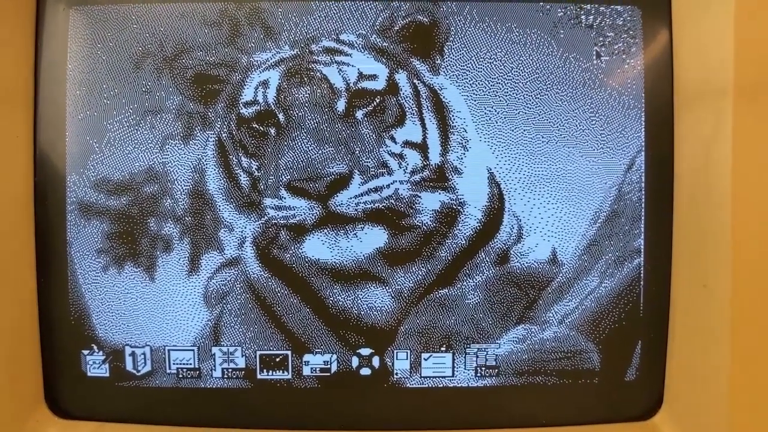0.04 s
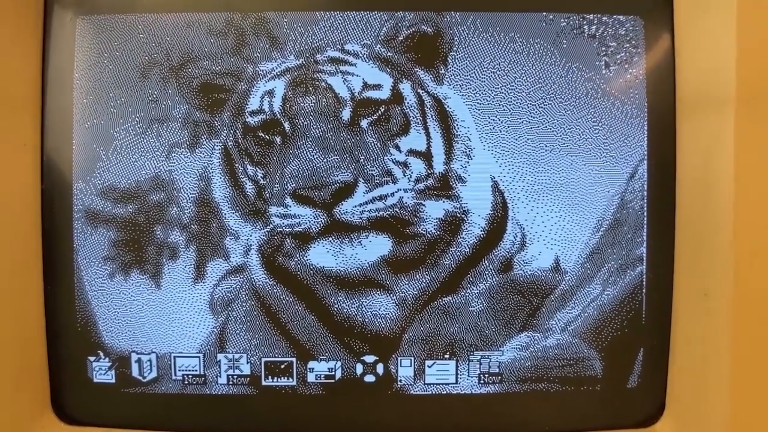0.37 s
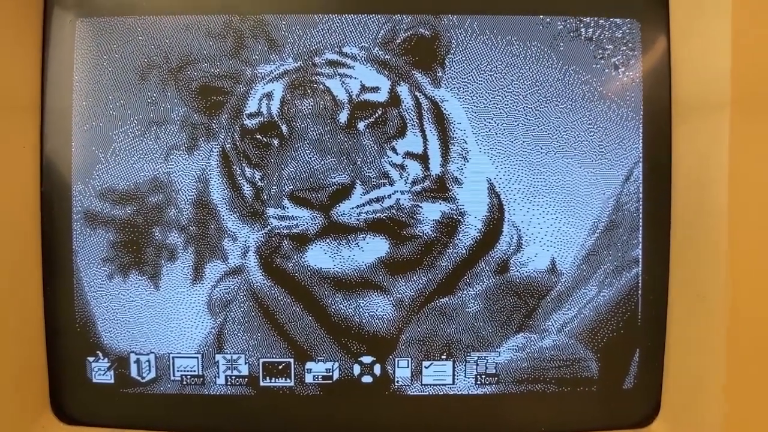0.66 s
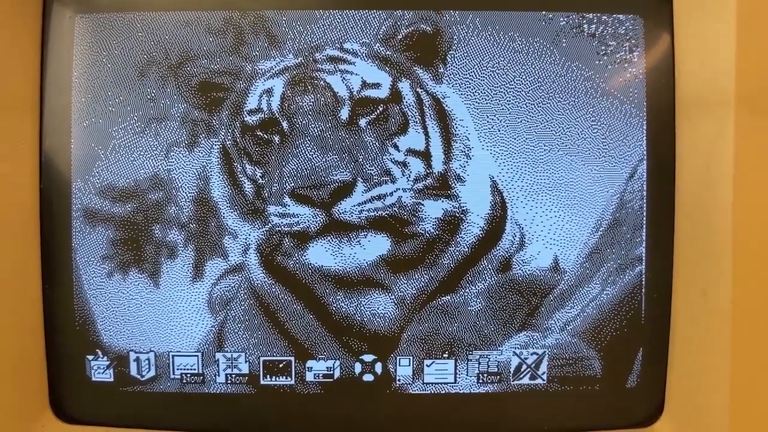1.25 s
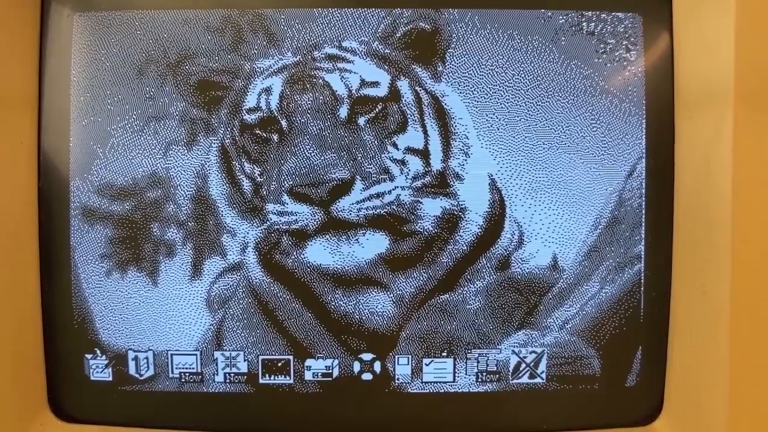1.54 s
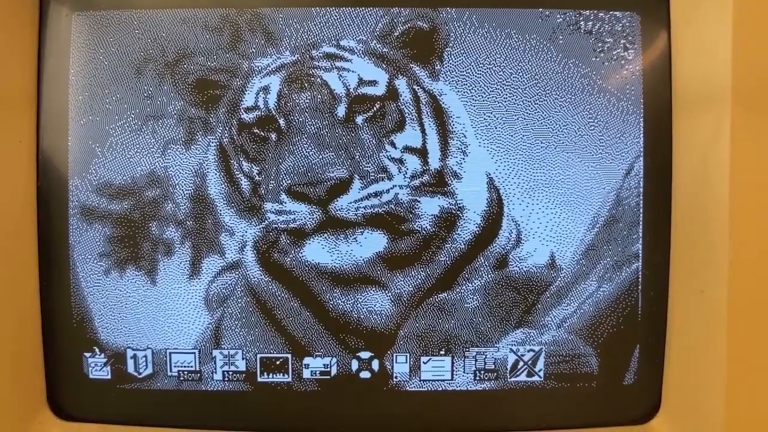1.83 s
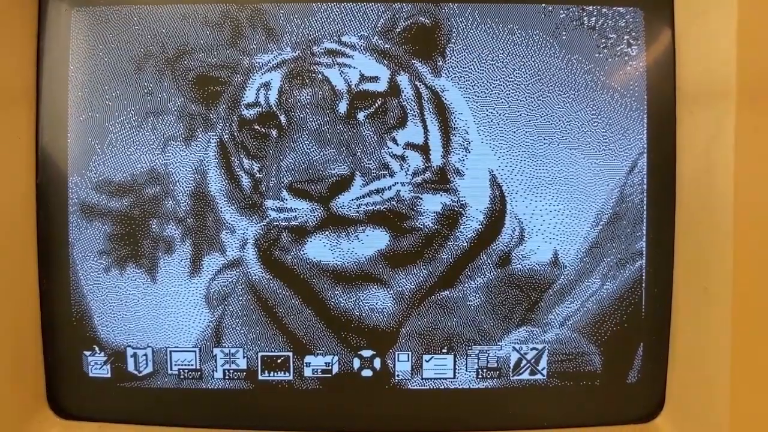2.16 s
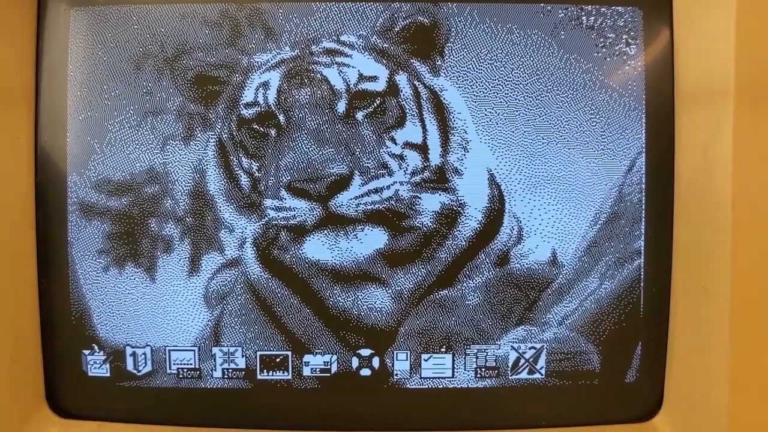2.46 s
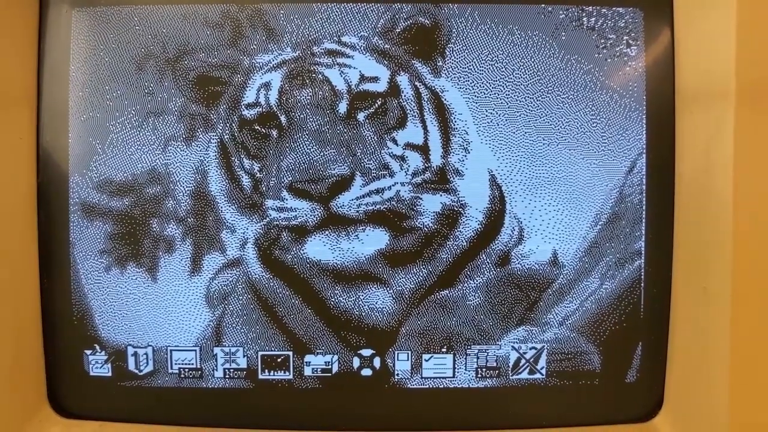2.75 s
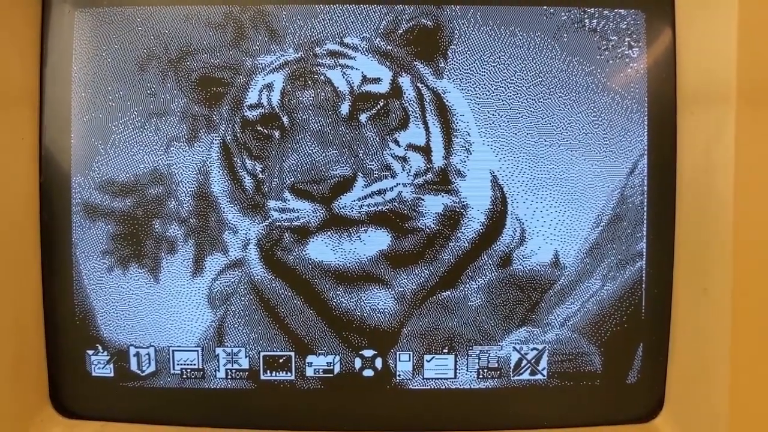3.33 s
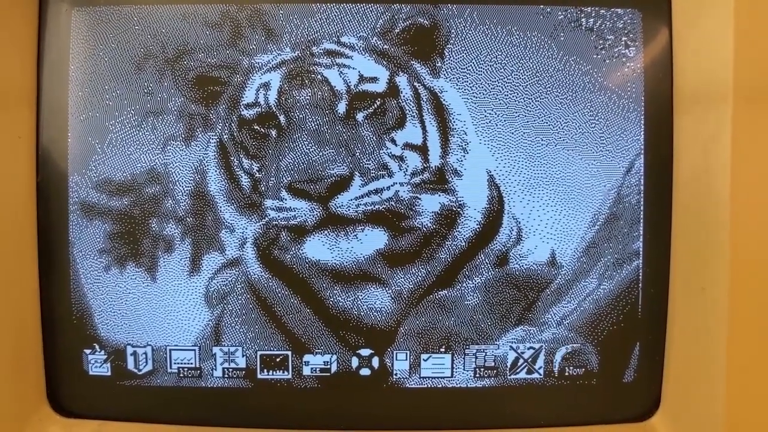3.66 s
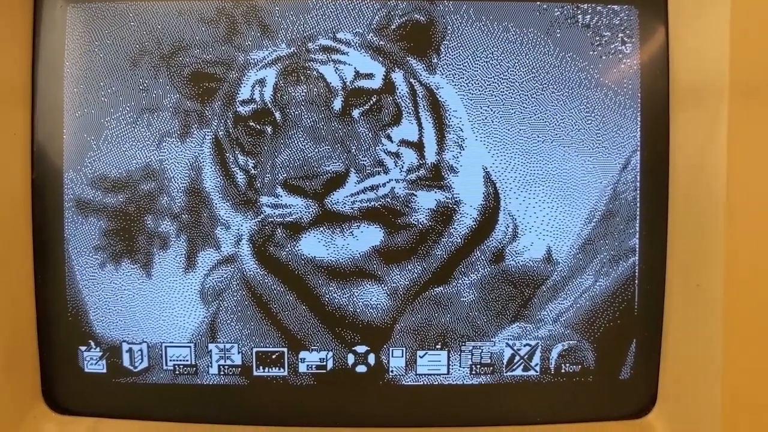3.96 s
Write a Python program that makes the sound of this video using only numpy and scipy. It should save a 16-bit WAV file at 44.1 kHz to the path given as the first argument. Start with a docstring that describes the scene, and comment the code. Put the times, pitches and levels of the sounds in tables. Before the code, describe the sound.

Disk drive chatter from an old computer runs throughout: short chirping rattles, soft knocks from the case and occasional sharp ticks, echoing briefly in a room. A steady whine, electrical hum and rumble of moving air lie underneath.

```python
"""Quick bursts of chirping, rattling and thumping come from the disk drive of an old desktop computer.
Each burst is a seek: the drive's head arm speeds up, brakes, and thumps the chassis as it stops.
A few sharp ticks fall among the seeks, and ticks and arm echo briefly in the room.
Behind them the spinning disk whines steadily over mains hum and a rumble of moving air."""
import sys
import numpy as np
from scipy import signal
from scipy.fft import rfft, irfft
from scipy.io import wavfile

SR = 44100
rng = np.random.default_rng(int(sys.argv[2]) if len(sys.argv) > 2 else 0)


def to_wav(s):
    """Save 16-bit WAV."""
    ch = np.atleast_2d(s).T  # columns
    pcm = np.round(np.clip(ch, -1, 1) * 32767)  # PCM
    wavfile.write(sys.argv[1], SR, pcm.astype(np.int16))


N = 176400  # 4 seconds

# Moves of the arm: (start [s], length [s], chirp pitch limit [Hz], arm level [dB], thump level [dB])
SEEK_MOVES = [(0.021, .014, 1900, -5.5, 2.5), (0.112, 0.028, 2800, -4.5, -0.5),
              (0.176, 0.029, 2600, -2.5, -0.5), (0.28, 0.028, 2600, -2, 0), (0.381, 0.028, 2600, -1.5, -1),
              (0.443, .015, 1970, -12, -1), (0.625, .011, 2020, -6, -4), (0.663, .012, 2030, -5, -6),
              (0.721, .012, 2050, -3.5, -4), (0.806, 0.0097, 1920, -5, -6), (0.941, 0.032, 2650, -3, -2),
              (1.009, 0.011, 1980, -2.5, -5), (1.057, 0.03, 2650, -3, -0.5), (1.18, 0.029, 2720, -2.5, 2.5),
              (1.279, 0.025, 2600, -2.5, -4), (1.348, .012, 1950, -4.5, -1.5), (1.439, .014, 2200, -5, 2),
              (1.491, .011, 2040, -3.5, -1), (1.733, 0.011, 2040, -5.5, -20), (1.778, .012, 2000, -6, -3.5),
              (1.821, .014, 2020, -3.5, -19), (1.872, 0.023, 2600, -3, 1), (1.948, .012, 1980, -5, -13),
              (1.994, .014, 1980, -5.5, -15), (2.109, 0.058, 2820, -3, -5), (2.207, .011, 2000, -7, -18),
              (2.242, .019, 1860, -2.5, -2), (2.399, 0.017, 1925, -3.5, 2.5),
              (2.463, .012, 1950, -5.5, -4.5), (2.513, .019, 2010, -2.5, -1.5),
              (2.591, .072, 2510, -4, -12), (2.729, 0.025, 2050, -2.5, 1), (2.818, .012, 2000, -4, 0),
              (2.869, .012, 2030, -5.5, -20), (3.01, 0.045, 2870, -2.5, 0),
              (3.093, 0.0065, 2000, -3.5, -20), (3.127, 0.018, 1940, -2.5, 2),
              (3.206, 0.023, 2040, -0.5, -1), (3.292, 0.052, 2513, -3, -7), (3.401, .013, 2020, -5.5, 0),
              (3.436, 0.012, 2000, -8, 0), (3.677, .014, 2050, -3.5, -8.5), (3.718, 0.049, 2480, -4, 0),
              (3.828, 0.053, 2520, -3, -0.5), (3.929, 0.049, 2520, -2, -1.5)]
# Notes at which the arm rings: (pitch [Hz], width [Hz], level [dB])
ARM_NOTES = [(954.6, 10.2, -6.5), (1165, 18, -11.5), (1599, 18, -14), (1937, 30, -0.5), (2133, 33, -10.5),
             (2470, 34, -12), (2790, 47, -7.5)]
def head_arm():
    """The moving arm chirps and rattles; the chirps and the jolts of its coil make it ring."""
    chirp, jolts = seek_chirps(), coil_jolts()
    ringing = np.zeros(N)
    for hz, width, db in ARM_NOTES:
        strikes = jolts * SR / (2 * np.pi * width)  # a jolt starts narrow and wide notes equally loud
        ringing += amp(db) * ring(chirp + strikes, hz, width)
    return (chirp + ringing) * amp([[-1.5], [1.5]]) + arm_rattle()  # a little to the right


def seek_chirps():
    """The arm crosses the disk's tracks: the faster it crosses them, the higher the chirp."""
    floor_hz, coast_hz, settle_s = 2080, 2543, .032
    chirps, shake = np.zeros(N), wander(600)
    for start, length, top_hz, db, _ in SEEK_MOVES:
        t, from_end, coast = seek_motion(length)
        limit_hz = np.where(t < settle_s, top_hz, coast_hz)  # long seeks settle on a steady zing
        track_hz = np.clip(2200 * (from_end / .0078) ** .264, floor_hz, limit_hz)
        jitter = (.052 - .04 * coast) * np.roll(shake, -round(start * SR))[:len(t)]
        phase = 2 * np.pi * np.cumsum(track_hz * (1 + jitter)) / SR
        squeak = np.sin(phase) + amp(-18.5) * np.sin(2 * phase)
        level = min(length / .032, 1) * amp(db - 6 * t / length)  # short seeks chirp less
        fade = np.minimum(from_end / .0022, 1)
        add(chirps, start, level * fade * squeak)
    return amp(-55.5) * chirps


def seek_motion(length):
    """One seek: time [s], time to its nearer end [s], and coasting (0 = pushed or braked, 1 = gliding)."""
    push_s = .0134
    t = np.arange(0, length + .065, 1 / SR)  # extra time lets the rattle die away
    from_end = np.maximum(np.minimum(t, length - t), 0)
    return t, from_end, np.clip(2 * (from_end / push_s - 1), 0, 1)


JOLT_INSET_S = .004  # jolts come about this long after a seek starts and before it ends
def coil_jolts():
    """The coil jolts the arm once to start it and once, harder, to brake it."""
    jolts = np.zeros(N)
    for start, length, _, db, _ in SEEK_MOVES:
        swing = min(length / .019, 1) ** 1.1  # short seeks swing little
        push_delay, brake_delay = .001485 * rng.random(2)
        add(jolts, start + JOLT_INSET_S + push_delay, swing * amp([db - 51]))
        add(jolts, start + length - JOLT_INSET_S + brake_delay, swing * amp([db - 49.5]))
    return signal.sosfilt(signal.butter(4, 2420, "lowpass", fs=SR, output="sos"), jolts)


# Tone colour of the arm's rattle: (frequency [Hz], level [dB])
RATTLE_COLOUR = [(100, -27), (230, 5), (330, 14), (440, -3), (560, 6), (680, 0.5), (820, 7), (950, -1.5),
                 (1040, 5.5), (1170, 4.5), (1480, -7), (1650, -18), (1920, -6.5), (2280, -11.5),
                 (2500, -9.5), (3100, -15.5), (3900, -13.5), (4800, -30.5), (5800, -23), (6800, -22.5),
                 (8200, -26), (9200, -31.5), (10400, -25.5), (13000, -52), (16000, -72)]
def arm_rattle():
    """The arm rattles as it is pushed, eases while it coasts and surges just before the braking jolt."""
    rise_s, release_s, surge_s = .0026, .013, .0054
    effort = np.zeros(N)
    for start, length, _, db, _ in SEEK_MOVES:
        t, _, coast = seek_motion(length)
        surge_at = length - JOLT_INSET_S - surge_s
        surge = 1 + amp(db - 1.5) * np.exp(-((t - surge_at) / surge_s) ** 2)
        fade = np.minimum(t / rise_s, 1) * np.exp(-np.maximum(t - length, 0) / release_s)
        add(effort, start, amp(db - 4 * coast) * surge * fade)
    grain = unit(amp(3 * wander(347)))  # makes the rattle uneven
    return amp(-53) * noise(RATTLE_COLOUR, effort * grain)


# Notes at which the chassis (the metal frame) rings: (pitch [Hz], width [Hz], level [dB])
CHASSIS_NOTES = [(228, 9.5, -17), (234, 10, -7), (297.4, 27.5, 6.5), (330.4, 55, 7)]
def chassis_thumps():
    """The chassis recoils lightly as the arm starts, and hard the other way as it stops."""
    blow_hz, blow_s = 273.3, .011
    push, t = np.zeros(N), np.arange(0, blow_s, 1 / SR)
    swell = np.sin(np.pi * (t / blow_s) ** .87)
    for start, length, _, _, db in SEEK_MOVES:
        hz = blow_hz * (1 + .086 * rng.standard_normal())
        blow = amp(db) * swell * np.sin(2 * np.pi * hz * t)
        add(push, start, amp(-12.5) * blow)
        add(push, start + length - .0025, -blow)
    ringing = sum(amp(db) * ring(push, hz, width) for hz, width, db in CHASSIS_NOTES)
    return amp(-44.5) * (push + ringing) * amp([[1], [-1]])  # a little to the left


# Sharp ticks: (time [s], snap level [dB], clack level [dB])
TICK_HITS = [(0.1316, 1.5, -4), (0.299, -17, -15), (0.963, -4.5, -11), (1.201, -2, -11),
             (1.446, -20, -10.5), (1.884, -17, -10), (2.6555, -6, -2), (3.338, -15, -6.5)]
# Tone colours of a tick's snap, high hiss and clack: (frequency [Hz], level [dB])
SNAP_COLOUR = [(300, 15), (2500, -7), (4000, 3.5), (5500, -9), (7000, -1.5), (8300, 3.5), (9500, -11),
               (12000, -21), (16000, -50)]
HISS_COLOUR = [(6000, -32), (10000, -3), (15500, -3)]
CLACK_COLOUR = [(200, -5), (700, 14), (1150, 15), (1500, 1), (2400, 3), (4200, -4.5), (5500, -10.5),
                (8500, -12), (13000, -44)]
def ticks():
    """Hard little contacts: a snap, brighter the harder it is, then a duller clack that swells and dies."""
    snap_s, tail_s, hiss_s, clack_s = .0014, .0027, .0044, .0046
    snap, hiss, clack = np.zeros((3, N))
    t = np.arange(0, .06, 1 / SR)
    for start, snap_db, clack_db in TICK_HITS:
        add(snap, start, amp(snap_db) * (np.exp(-t / snap_s) + amp(-19) * np.exp(-t / tail_s)))
        add(hiss, start, amp(4.5 * snap_db) * np.exp(-t / hiss_s))  # heard on the hardest snaps only
        add(clack, start, amp(clack_db) * np.sqrt(2 * np.e * t / clack_s) * np.exp(-t / clack_s))
    return (amp(-46.5) * noise(SNAP_COLOUR, snap)
            + amp(-75) * noise(HISS_COLOUR, hiss)
            + amp(-46) * noise(CLACK_COLOUR, clack))


# Tones of the whine: (multiple of the spin rate, left level [dB], right level [dB])
WHINE_TONES = [(1, -60.5, -60), (6, -72.5, -96), (12, -56, -61), (13, -75, -63), (17, -67, -80),
               (18, -67.5, -76), (19, -72.5, -59), (24, -85.5, -70), (25, -87, -79), (29, -85, -74),
               (31, -71, -83), (37, -78.5, -77), (44, -94, -83), (49, -86, -94), (64, -89, -86)]
def spindle_whine():
    """The disk whines at multiples of its barely wavering spin rate, left and right a bit out of step."""
    spin_hz = 69.75 * (1 + .0004 * wander(1.2))
    turns = np.cumsum(spin_hz) / SR
    whine = np.zeros((2, N))
    for multiple, left_db, right_db in WHINE_TONES:
        side_shift = rng.choice([-1, 1]) * np.array([[.05], [-.05]])
        cycles = multiple * turns + rng.random() + side_shift
        whine += amp([[left_db], [right_db]]) * np.sin(2 * np.pi * cycles)
    return np.sqrt(2) * whine


def mains_hum(hz=60):
    """The alternating current of the power line makes one low, steady tone."""
    return amp(-56.5) * np.sqrt(2) * np.sin(2 * np.pi * hz * np.arange(N) / SR)


# Tone colour of the moving air: (frequency [Hz], level [dB])
AIR_COLOUR = [(20, -33), (35, -22.5), (50, -15), (65, -1), (100, -3.5), (160, -1), (188, -4), (225, -4),
              (310, -5), (380, -13), (460, -20), (560, -20), (660, -18.5), (850, -24), (1050, -24),
              (1250, -26), (1480, -29.5), (1750, -25.5), (2100, -33), (2350, -35), (2800, -35.5),
              (3600, -36.5), (4500, -41.5), (5500, -46), (7500, -46), (8800, -51.5), (10600, -50.5),
              (13000, -71), (16000, -66)]
# Notes that the air keeps humming: (pitch [Hz], width [Hz], left level [dB], right level [dB])
AIR_NOTES = [(213.04, 10.3, -58, -58.5), (239.5, 18, -61, -61.5), (287.5, 4.6, -62.5, -63),
             (521.5, 31, -71, -71.5), (791.2, 24, -80, -63.5), (937, 12, -75.5, -83),
             (7700, 82, -100, -103), (10700, 43, -100.5, -115)]
def air_rumble():
    """Air rumbles through the case and keeps its natural notes humming."""
    air = amp(-48.5) * noise(AIR_COLOUR)
    for hz, width, left_db, right_db in AIR_NOTES:
        hum = ring(rng.standard_normal(N), hz, width)
        air += amp([[left_db], [right_db]]) * unit(ring(hum, hz, width))  # ringing twice is purer
    return air


# How long the room echoes: (frequency [Hz], time to fade by 60 dB [s])
ECHO_TIMES = [(200, 0.7), (1000, 0.094), (3000, 0.23), (10000, 0.071)]
def room_echo(sound):
    """The room smears a sound into a short tail that lasts longest in the bass."""
    hiss = noise([(20, 0), (20000, 0)])[:, :SR // 2]
    hz, t, spectrum = signal.stft(hiss, SR, nperseg=256)
    fade = amp(-60 * t / look_up(ECHO_TIMES, hz)[:, None])
    _, tail = signal.istft(spectrum * fade, SR, nperseg=256)
    return signal.fftconvolve(sound, tail / np.linalg.norm(tail[0]), axes=1)[:, :N]


# How alike left and right sound: (frequency [Hz], likeness [1 or more = same, 0 = unrelated])
SIDE_LIKENESS = [(40, 1.5), (300, 0.9), (500, 0.53), (1000, 0.21), (2000, .5), (4000, 0.46), (8000, -0.44),
                 (12000, 1)]
# Which side is louder: (frequency [Hz], left minus right [dB])
SIDE_BALANCE = [(60, 5), (150, -0.5), (300, 0), (500, 4), (750, 5), (950, 0.5), (1200, -4), (1700, -1.5),
                (2200, 0.5), (3400, -5), (4500, -2), (7000, -2.5), (12000, 1)]
def noise(colour, level=1):
    """Stereo noise that follows a level over time, then takes on a tone colour."""
    hz = np.fft.rfftfreq(N, 1 / SR)
    left, unrelated = rfft(level * rng.standard_normal((2, N)))
    likeness = np.clip(look_up(SIDE_LIKENESS, hz), -1, 1)
    right = likeness * left + np.sqrt(1 - likeness ** 2) * unrelated
    lean = amp(look_up(SIDE_BALANCE, hz) / 2)
    return irfft(np.array([left * lean, right / lean]) * unit(amp(look_up(colour, hz))), N)


def ring(sound, hz, width):
    """Lets a sound ring at one pitch; the smaller the width [Hz], the longer it rings."""
    decay = np.exp(-np.pi * width / SR)
    return 2 * signal.lfilter([1 - decay], [1, -decay * np.exp(2j * np.pi * hz / SR)], sound).imag


def wander(hz):
    """A smooth random wobble of typical size 1, mostly slower than hz."""
    keep_slow = np.exp(-(np.fft.rfftfreq(N, 1 / SR) / hz) ** 2)
    return unit(irfft(rfft(rng.standard_normal(N)) * keep_slow, N))


def amp(db):
    """Turns decibels into a multiplier."""
    return 10 ** (np.asarray(db) / 20)


def unit(x):
    """Scales a signal to a typical size (rms) of 1."""
    return x / np.sqrt(np.mean(x ** 2) + 1e-20)


def look_up(table, hz):
    """Reads between a table's rows, with octaves evenly spaced."""
    row_hz, values = np.transpose(table)
    return np.interp(np.log(hz + 1), np.log(row_hz + 1), values)


def add(mix, start_s, sound):
    """Mixes a sound in at its start time."""
    part = mix[max(round(start_s * SR), 0):][:len(sound)]
    part += sound[:len(part)]


def scene():
    """The seeking drive in its room, over steady whine, hum and rumble."""
    chatter = head_arm() + ticks()
    drive = chatter + amp(-3.5) * room_echo(chatter) + chassis_thumps()
    return drive + spindle_whine() + mains_hum() + air_rumble()


def record(dry):
    """Cuts off the very highest treble."""
    lowpass = signal.firwin(511, cutoff=15750, window=("kaiser", 9), fs=SR)
    return signal.oaconvolve(dry, lowpass[None], "same")


dry = scene()
out = record(dry)
to_wav(out)
```